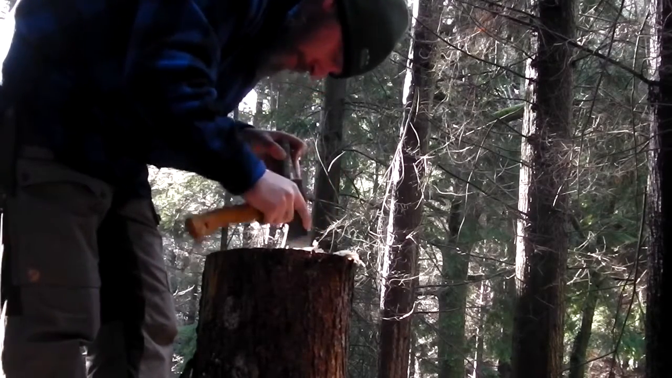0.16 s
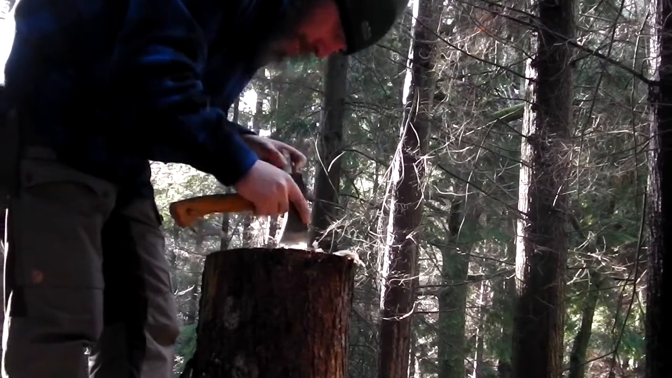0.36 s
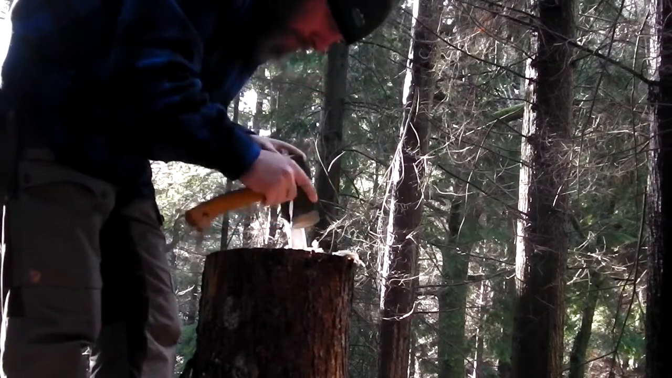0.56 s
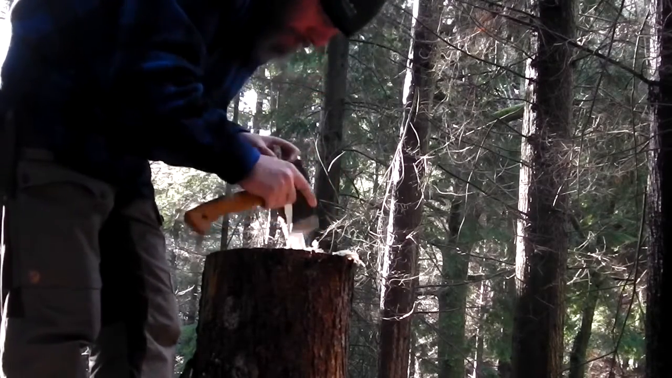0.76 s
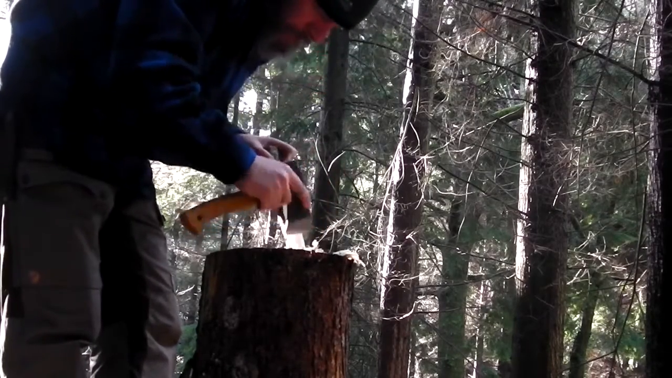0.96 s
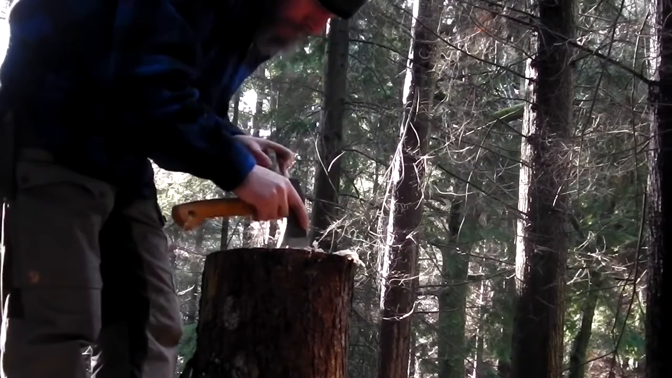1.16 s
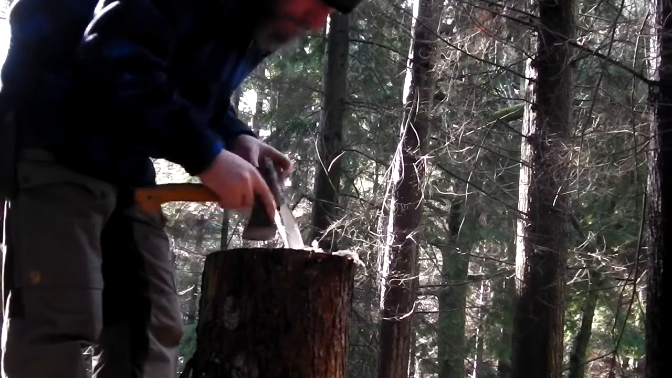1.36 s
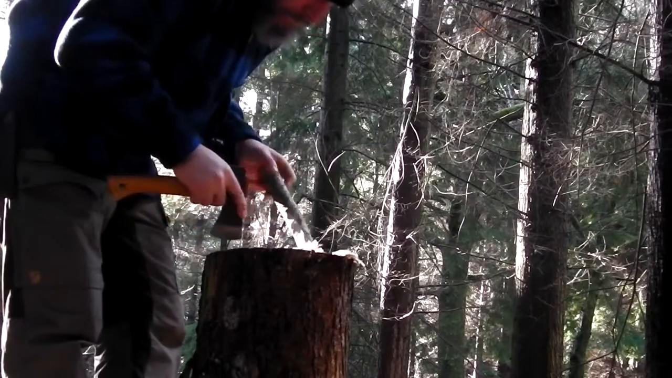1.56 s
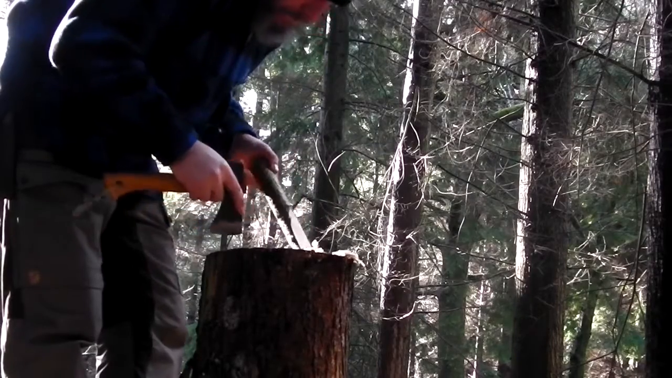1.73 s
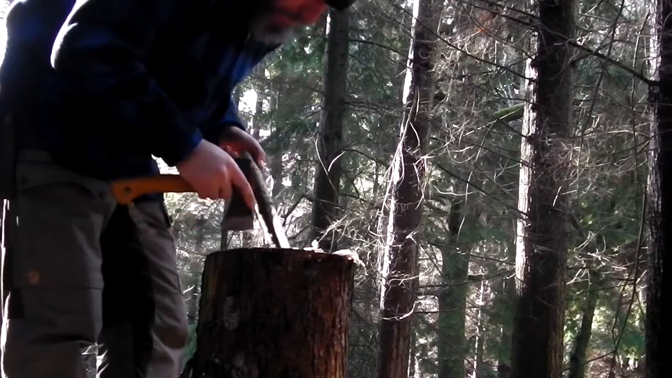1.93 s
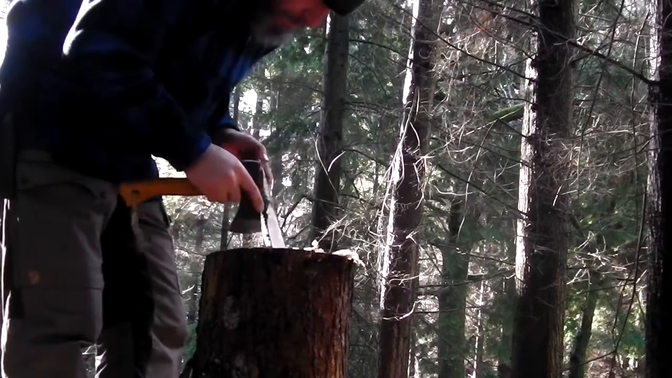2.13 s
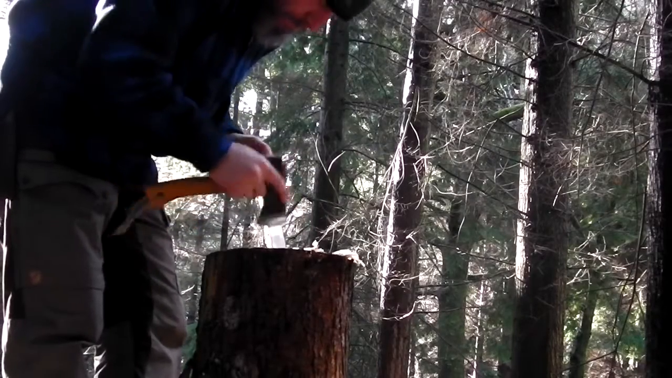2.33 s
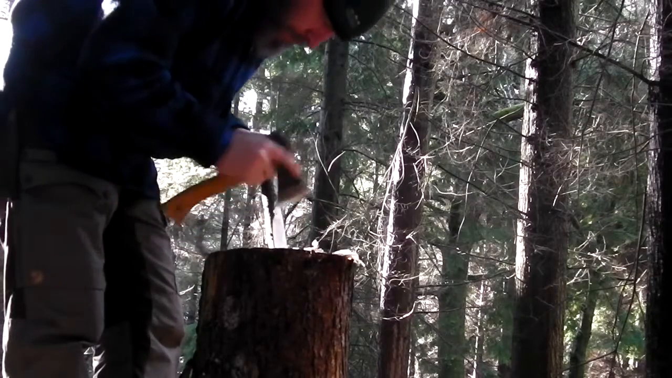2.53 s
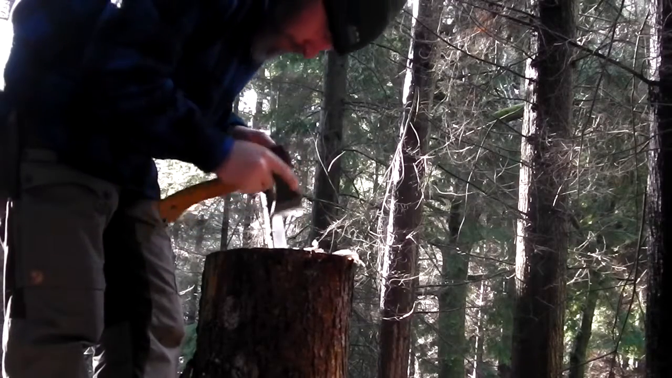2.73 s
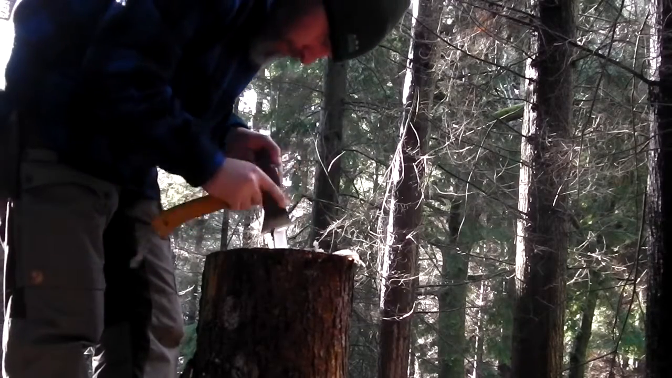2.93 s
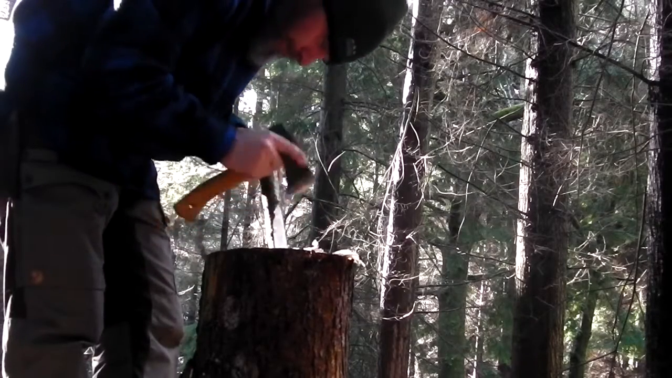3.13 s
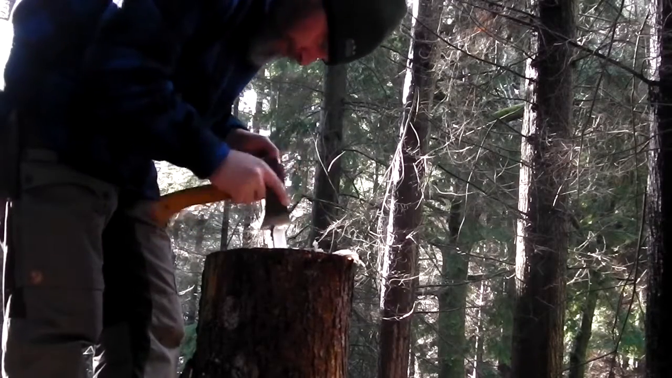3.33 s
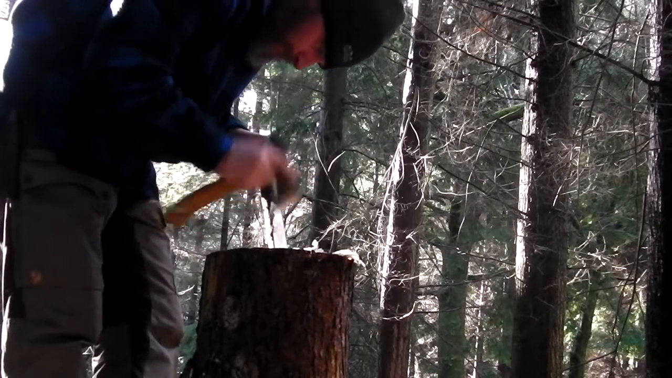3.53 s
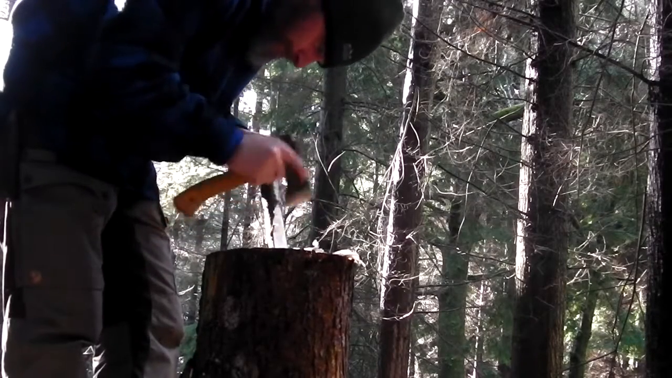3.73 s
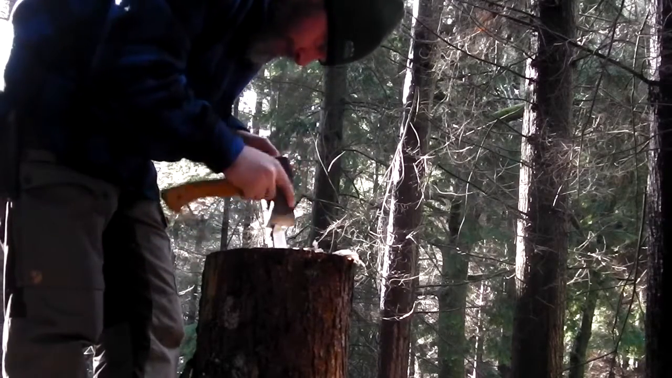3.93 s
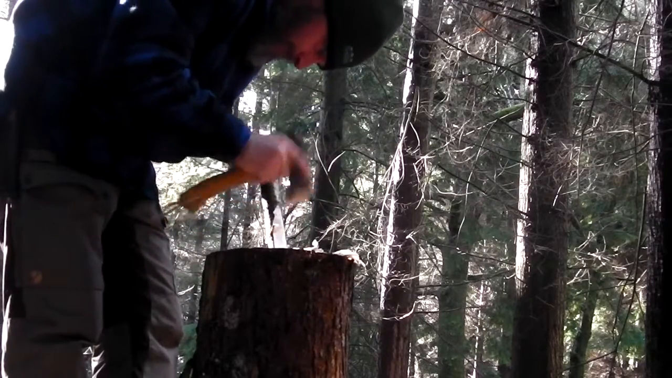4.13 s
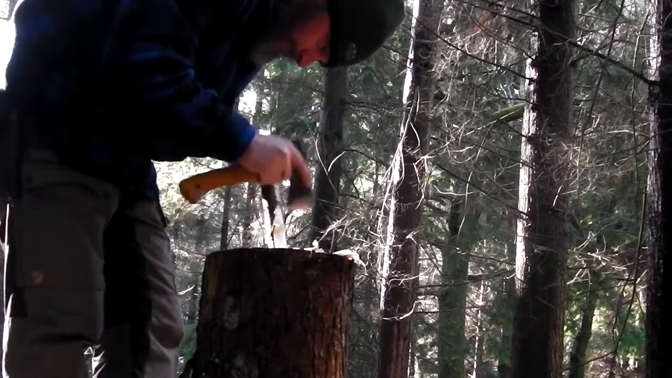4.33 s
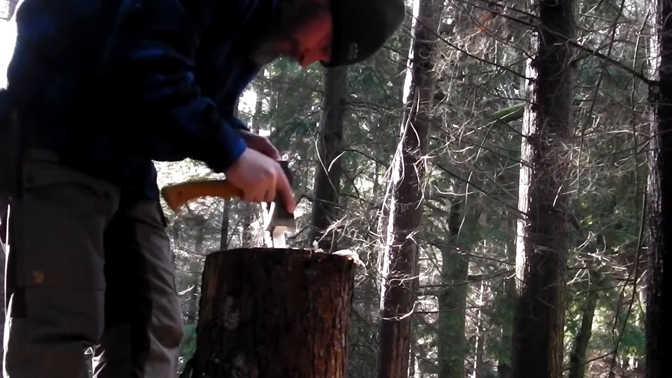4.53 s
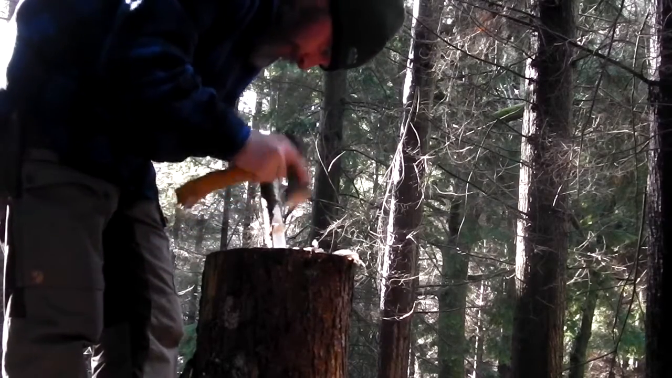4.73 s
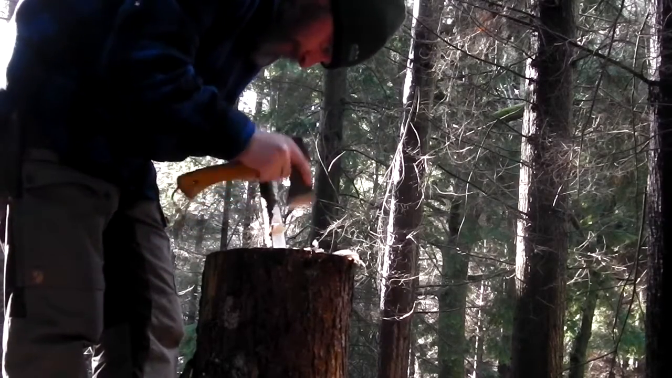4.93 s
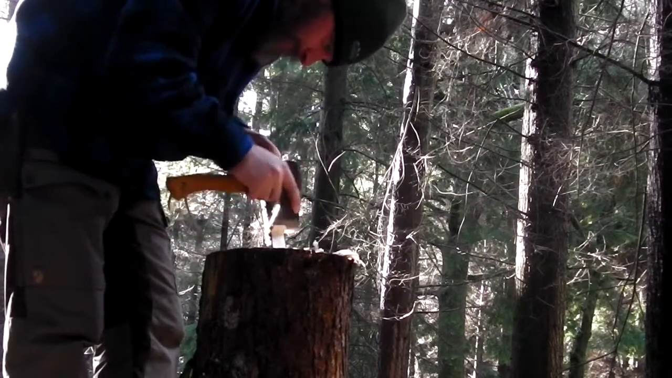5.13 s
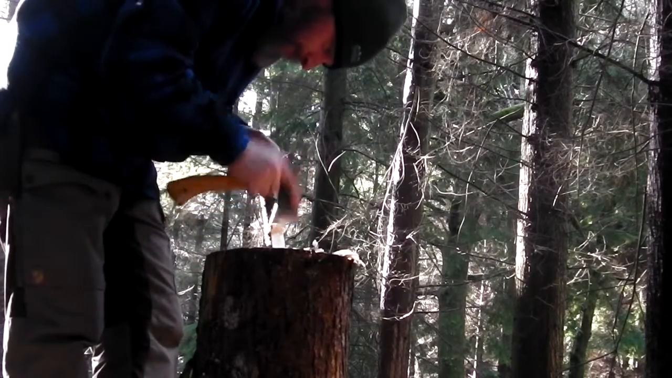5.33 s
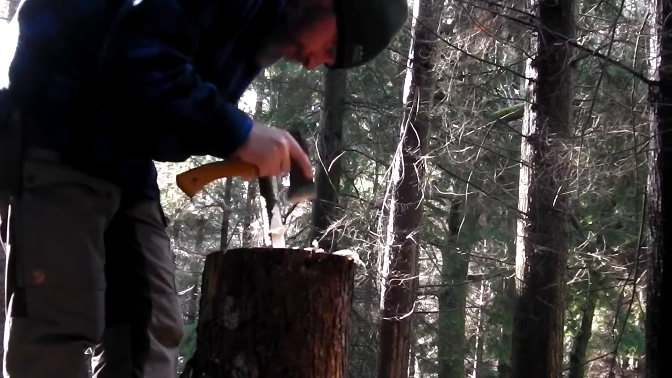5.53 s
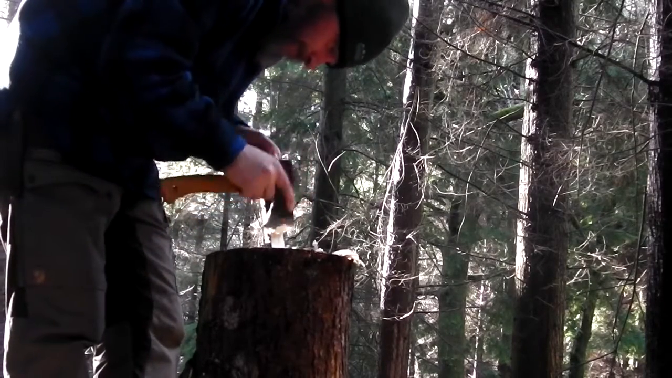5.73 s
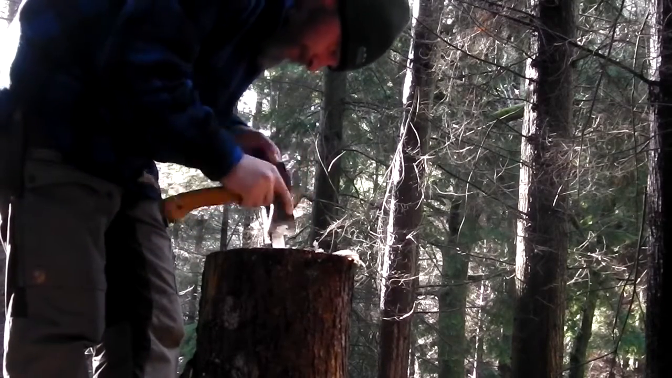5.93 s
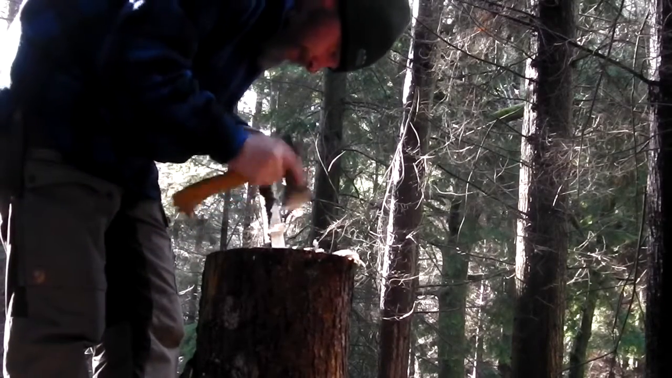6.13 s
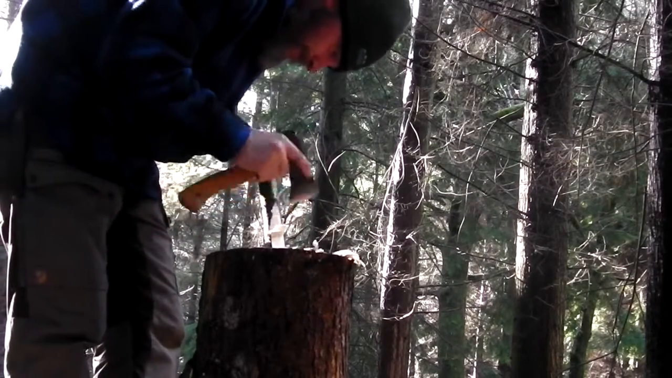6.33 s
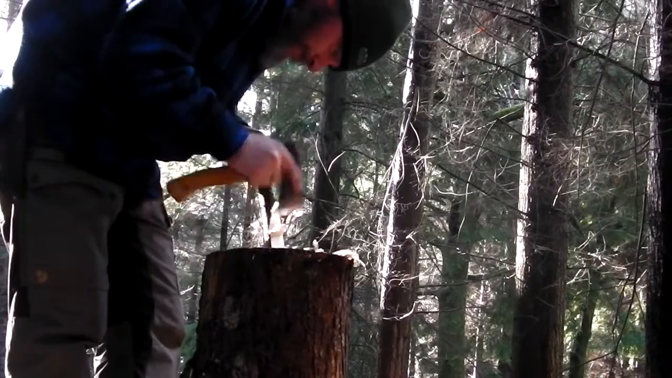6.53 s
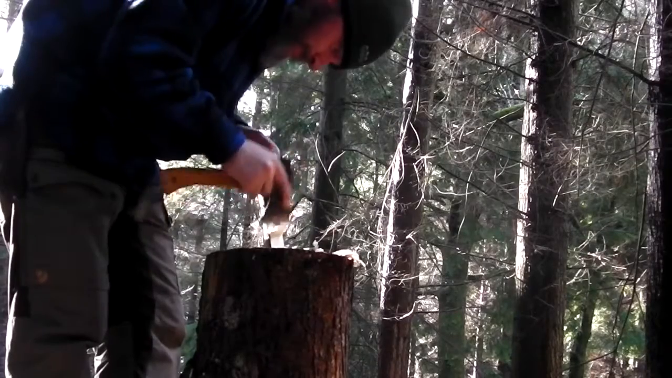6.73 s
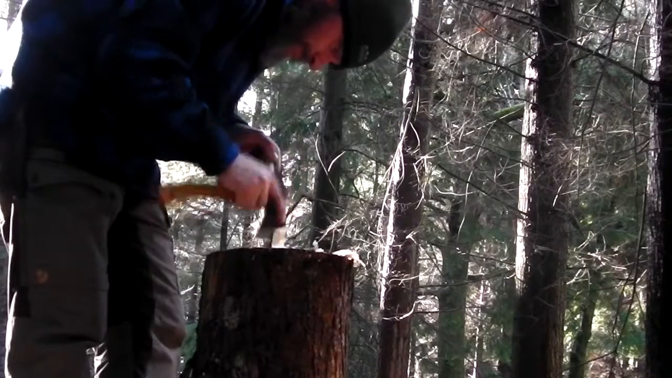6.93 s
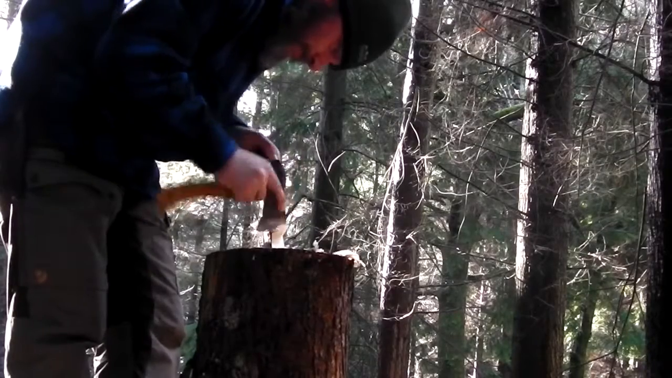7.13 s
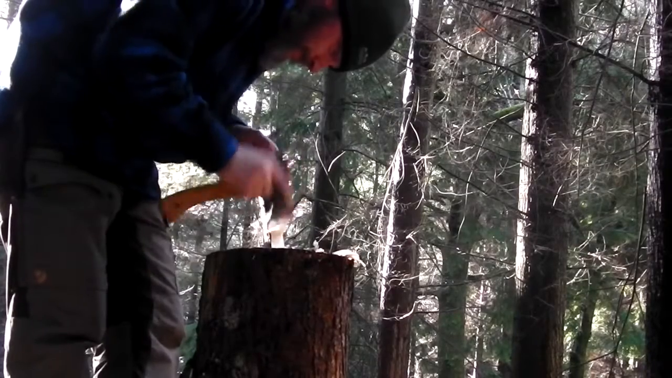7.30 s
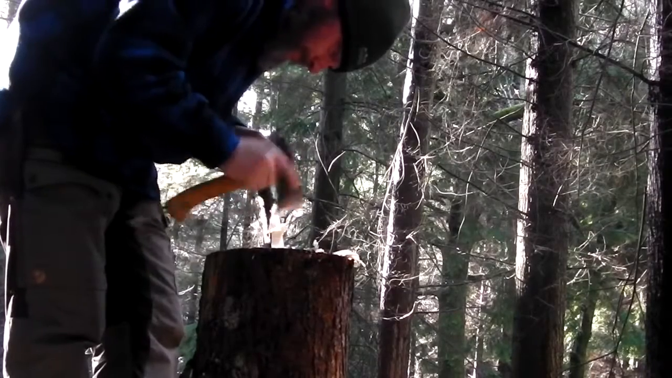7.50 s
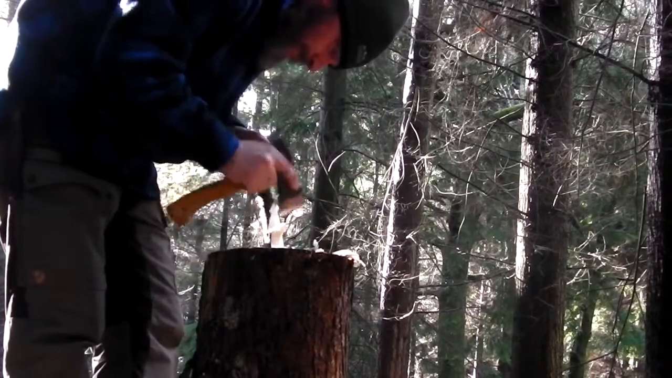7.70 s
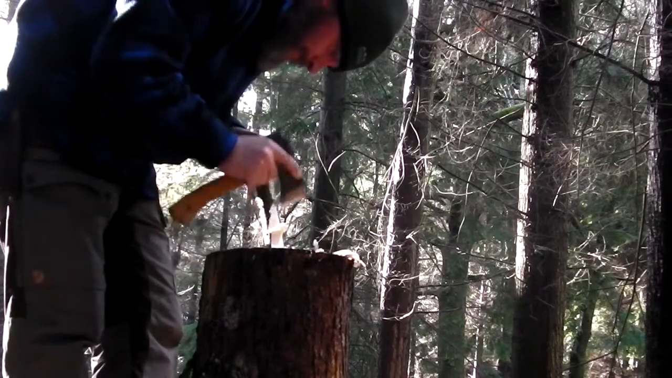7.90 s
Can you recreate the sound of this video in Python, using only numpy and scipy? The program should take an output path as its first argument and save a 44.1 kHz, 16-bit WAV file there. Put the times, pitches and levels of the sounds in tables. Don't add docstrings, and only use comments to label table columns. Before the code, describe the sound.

Stereo microphone about two metres from a stump outdoors. Light hatchet bites make hollow, dry clacks, many doubled by a tiny second knock, with a slight blade ring and torn-fibre crackle. A few loose taps, a gap of nearly two seconds, then regular chopping that speeds up and peaks near the end. Short diffuse woodland echo, low far traffic and engine drone, sparse thin bird whistles and gentle hiss.

```python
import sys
import numpy as np
from scipy import signal
from scipy.fft import rfft, irfft
from scipy.io import wavfile
from scipy.ndimage import uniform_filter1d

SR = 44100
rng = np.random.default_rng(int(sys.argv[2]) if len(sys.argv) > 2 else 0)


def level_to_linear(level):
    exponent = np.asarray(level, float) / 20
    return 10 ** exponent


def unload_audio(sound):
    columns = np.transpose(np.atleast_2d(sound))
    steps = np.round(np.clip(columns, -1, 1) * 32767)
    wavfile.write(sys.argv[1], SR, steps.astype(np.int16))


N = 355432

# start_s, bending_db, knock_db, knock_centre_hz, blade_db
BITES = [(0.135, -27, -28, 2470, -41), (0.652, -25.5, -24, 2350, -42.5), (0.858, -37, -29.5, 1570, -43.5),
         (1.044, -33.5, -32, 1760, -47.5), (2.939, -21, -30.5, 1710, -40), (3.269, -23, -27, 2230, -31.5),
         (3.592, -21, -24.5, 2250, -32.5), (3.894, -18, -20, 2340, -29), (4.201, -19.5, -25, 2460, -33),
         (4.5014, -18.5, -18.5, 2330, -33.5), (4.799, -20, -22.5, 2250, -38),
         (5.09, -22.5, -22.5, 2540, -37), (5.372, -21, -23, 2320, -41.5), (5.666, -21.5, -20.5, 2310, -33),
         (5.953, -23.5, -29.5, 2330, -38), (6.201, -22, -25.5, 2140, -36),
         (6.449, -19.5, -12.5, 2360, -25.5), (6.679, -20, -19.5, 2390, -31),
         (6.9134, -19.5, -14, 2440, -24), (7.129, -17.5, -9, 2590, -18), (7.3546, -19.5, -8.5, 2370, -26),
         (7.5694, -18.5, -12, 2450, -29), (7.778, -21, -21.5, 2160, -37.5),
         (7.989, -19.5, -15.5, 2083, -33.5)]
# start_s, bending_db, knock_db, stump_db
STOPS = [(0.864, -31, -41.5, -66), (1.05, -35, -43, -50), (1.083, -52, -64, -48), (2.943, -40, -26.5, -44),
         (3.275, -38.5, -34.5, -49), (3.599, -37, -30, -46), (4.208, -43, -32.5, -49),
         (4.509, -36, -31, -44), (4.515, -32, -34, -67), (4.813, -34, -34, -39), (4.819, -40, -45, -72),
         (5.108, -42, -49, -44.5), (5.387, -29.5, -32, -48), (5.394, -33.5, -37, -48),
         (5.679, -33, -26.5, -46.5), (5.961, -35, -38.5, -40.5), (6.21, -24, -27, -44),
         (6.456, -27.5, -28, -65), (6.69, -21.5, -24.5, -35), (6.696, -31, -46, -42),
         (6.924, -26.5, -23, -41.5), (7.133, -42, -21, -43), (7.36, -36, -33, -46),
         (7.574, -31, -21.5, -45), (7.995, -27, -34, -38)]
# start_s, bending_db, stump_db
NUDGES = [
    (2.6143, -22, -54),
    (0.398, -52, -67),
    (1.715, -53, -57),
    (1.869, -61, -51),
    (4.459, -65, -53),
    (4.719, -65, -53),
    (5.619, -58, -48.5),
    (6.168, -62, -62),
    (6.605, -60, -50),
]
# start_s, stump_db, stand_db
JOLTS = [(.135, -47, -47), (0.652, -46.5, -44), (0.857, -46, -70), (1.044, -44, -55), (2.615, -41, -47),
         (3.270, -52.5, -38), (3.59, -46, -40), (3.896, -42, -35), (4.202, -40.5, -36.5), (4.800, -68, -58),
         (5.371, -48, -70), (5.952, -56, -70), (6.201, -56, -70), (6.45, -38.5, -70), (6.679, -49, -68),
         (7.128, -44, -70), (7.569, -39.5, -75.5), (7.78, -43, -70), (7.989, -49, -71)]
# start_s, length_s, level_db, brightness_db_per_octave
TEARS = [(0.658, .018, -56, -2.5), (0.869, 0.016, -62.5, 3), (1.059, 0.022, -66, 0.5),
         (2.939, 0.0071, -47.5, 1), (3.268, 0.008, -49, 1.5), (3.596, 0.0066, -53, 2.5),
         (3.895, 0.0085, -50.5, -1), (4.203, 0.0077, -49.5, -2.5), (4.506, 0.0074, -60, 4),
         (4.8, 0.013, -51, -2.5), (5.091, 0.012, -52.5, -2), (5.381, 0.017, -55.5, 4),
         (5.68, 0.0084, -51, -0.5), (5.954, 0.0093, -52, -1.5), (6.202, 0.017, -51.5, -6),
         (6.447, 0.01, -49.5, -1), (6.684, .016, -44.5, -7), (6.928, 0.01, -50, 5), (7.136, 0.013, -50, -2),
         (7.353, 0.01, -46.5, -1), (7.569, 0.02, -56.5, -5), (7.781, 0.011, -55, 0),
         (7.995, 0.012, -49.5, -3.5)]
# pitch_hz, level_db, t60_s, left_minus_right_db, left_lead_rad
BENDING = [(935, 0, .04, 2.5, 0), (735, -8, .026, 2, .05), (550, -10.5, .026, 2, .1),
           (390, -14, .03, 1, .15), (1030, -15, .024, 2, 0)]
KNOCK = [(1714, 3.5, 0.027, -3.5, -0.16), (2062, 1, 0.021, 2.5, -0.055), (2393, 2, 0.024, 0.5, -0.24),
         (2696, 3.5, 0.01, 3, -0.53), (3015, 7.5, 0.014, 0.5, -.65)]
BLADE = [(3820, -5, 0.011, -14.5, -3.3), (4446, -8, 0.1, 0, 0.45), (4660, -5.5, 0.015, 2, -0.3),
         (4910, -14, 0.013, -8, 0.5), (6410, -13.5, 0.028, -0.5, 1.52), (8700, -18.5, 0.0088, 0, 2),
         (10350, -14, 0.019, 5.5, 1.57), (12200, -17, .006, 4, -8.5), (15200, -23, .005, 11, 1)]
STUMP = [(107.6, -2.5, 0.12, 0.1, 0.45), (151, 1, 0.039, 0.73, 0.45), (235, -4.5, 0.019, 0.85, .2)]
STAND = [(38, 0, 0.036, 0, .2)]
# pitch_hz, level_db
FIBRE_TONE = [(900, -7), (1400, -6), (2400, 2.5), (4500, -10.5), (6800, -12), (7800, -26.5), (10200, -17),
              (15000, -26)]
# pitch_hz, level_db
TRUNKS_TONE = [(150, -24), (500, -27), (950, -3), (1350, 1.5), (1900, 8), (2600, 1.5), (3400, -6),
               (4600, -5.5), (6500, -22), (15000, -38)]
NEAR_TRUNK_TONE = [(900, -9), (2000, -12), (3000, 3.5), (5000, 6), (9000, -6)]
# pitch_hz, level_db_per_hz
ROAR_MID = [(15, -43), (25, -34), (43, -12), (64, -1), (149, -1.5), (263, -13), (405, -8), (911, -10),
            (1840, -22), (4610, -26), (6600, -28.5), (7800, -31.5), (9500, -30), (16000, -32)]
ROAR_SIDE = [(15, -41), (25, -15), (80, 0), (153, -4), (206, -17), (405, -7.5), (695, -11), (775, -11),
             (2550, -16), (3820, -16), (16000, -27.5)]
# time_s, level_db
SWELL = [(0, -3.5), (.6, -5), (1.6, -3.8), (3.2, -2), (4.0, -.2), (4.9, -0.8), (5.3, 0), (6.8, 1.2),
         (8.06, -1.6)]
# time_s, pitch_hz, level_db
DRONE_LOW = [(0, 80, -76), (.6, 79, -69), (2.1, 80, -66), (2.7, 78, -71), (4.0, 77, -69), (4.6, 77, -78),
             (8.06, 77, -82)]
DRONE_HIGH = [(0, 150, -80), (1.3, 158, -73), (2.4, 158, -71), (3.0, 150, -80), (4.4, 128, -72),
              (5.2, 128, -66), (6.6, 140, -64), (7.4, 128, -68), (8.06, 127, -69)]
# start_s, length_s, first_pitch_hz, last_pitch_hz, level_db
BIRDS = [
    (.90, .14, 3300, 3280, -70),
    (1.15, .4, 4230, 4180, -74),
    (1.75, .22, 2850, 2850, -70),
    (4.85, .36, 3140, 3100, -58),
    (4.865, .06, 4150, 4120, -65),
    (7.865, .1, 3520, 3480, -65),
]


def colour(x, points):
    hz, db = np.transpose(points)
    grid = np.maximum(np.fft.rfftfreq(x.shape[-1], 1 / SR), 1)
    gain = level_to_linear(np.interp(np.log(grid), np.log(hz), db))
    return irfft(rfft(x) * gain, x.shape[-1])


def level(x, db):
    return x * level_to_linear(db) / np.sqrt(np.mean(x ** 2))


def walk(rate):
    hold = int(SR / rate)
    steps = np.repeat(rng.standard_normal(N // hold + 1), hold)
    return 1.5 * uniform_filter1d(uniform_filter1d(steps, hold), hold)[:N]


def add(out, x, s):
    i = int(s * SR)
    out[:, i:i + x.shape[1]] += x[:, :N - i]


def slope(modes, db_per_octave, pivot_hz):
    return db_per_octave * np.log2(np.array(modes)[:, :1] / pivot_hz)


def ring(modes, db, push_s, chance, tilt_db=0, choke_s=1, turn=0):
    t = np.arange(int(.12 * SR)) / SR - push_s
    hz, mode_db, t60, pan_db, lead = (c[:, None] for c in np.transpose(modes))
    detune, scatter, slip = chance[:, :len(hz), None]
    hz = hz * (1 + .015 * detune)
    mode_db = mode_db + tilt_db + 2.0001 * scatter
    dying = np.exp(-np.log(1000) * t / t60 - (t / choke_s) ** 2)
    building = np.sin(np.pi / 2 * (1 + t / push_s))
    size = level_to_linear(mode_db) * np.where(t < 0, building, dying)
    phase = 2 * np.pi * hz * t + 1.05 * slip - turn
    both = np.array([(size * level_to_linear(k * pan_db) * np.cos(phase + k * lead)).sum(0) for k in (.5, -.5)])
    return both * level_to_linear(db) / np.abs(both.mean(0)).max()


def blade_under(bend_db, knock_db):
    return bend_db - 7.5 + 0.86 * (knock_db - bend_db)


def hatchet():
    out = np.zeros((2, N))
    grip_s, wedge_s, blade_push_s = 0.009, .0017, 0.00081
    stop_hz, nudge_hz = 2290, 1930
    nudges = []
    for s, bend_db, _ in NUDGES:
        knock_db = bend_db - 19
        nudges.append((s, bend_db, knock_db, nudge_hz, blade_under(bend_db, knock_db)))
    stops = [(s, bend_db, knock_db, stop_hz, blade_under(bend_db, knock_db)) for s, bend_db, knock_db, _ in STOPS]
    edge_db = slope(BLADE, -1, BLADE[1][0])
    for contacts, stuck in ([*BITES, *nudges], 0), (stops, 1):
        choke_s = grip_s / (1 + stuck)
        low_db = stuck * slope(BENDING, -7, BENDING[0][0])
        for s, bend_db, knock_db, centre_hz, blade_db in contacts:
            s = s + stuck * .001
            chance = rng.standard_normal((4, 3, 9))
            near_db = np.maximum(-37 * np.abs(slope(KNOCK, 1, centre_hz)), -15.5)
            add(out, ring(BENDING, bend_db + 3.5, wedge_s, chance[0], low_db, choke_s), s)
            add(out, ring(KNOCK, knock_db + 5.5, wedge_s, chance[1], near_db, choke_s), s)
            add(out, ring(BLADE, blade_db + 5, blade_push_s, chance[2], edge_db, choke_s), s)
    return out


def shavings():
    out = np.zeros((2, N))
    t = np.arange(4096) / SR
    for s, length, db, bright_db in TEARS:
        chance = rng.random((3, 2, 4096))
        snap_size = level_to_linear(-2.5 * np.log(chance[2] + 1e-2))
        snaps = (chance[0] < .2) * np.sign(chance[1] - .5) * snap_size
        tone = [(hz, fibre_db + bright_db * np.log2(hz / 2400)) for hz, fibre_db in FIBRE_TONE]
        u = t / length
        swell = u ** 2 * np.exp(2 - 2 * u - u ** 2)
        mid, side = level(colour(snaps, tone), db + 18.5) * swell
        add(out, np.array([(mid + .4 * side) * level_to_linear(1.2), (mid - .4 * side) * level_to_linear(-1.2)]), s)
    return out


def stump():
    out = np.zeros((2, N))
    thuds = [row[:2] for row in JOLTS] + [(row[0], row[-1]) for row in NUDGES + STOPS]
    for s, thud_db in thuds:
        chance = rng.standard_normal((3, 3)) / 2
        add(out, ring(STUMP, thud_db + 7.5, 0.0038, chance, turn=np.pi / 2), s)
    return out


def stand():
    out = np.zeros((2, N))
    for s, _, db in JOLTS:
        add(out, ring(STAND, db, 0.002, rng.standard_normal((3, 1))), s)
    return out


def trunks(dry):
    echo_db, t60_s, rise_s = -6.5, 0.58, 0.049
    near_db, near_s = -35.5, .0503
    t = np.arange(int(.9 * SR)) / SR
    shape = (1 - np.exp(-(t / rise_s) ** 2)) * np.exp(-np.log(1000) * t / t60_s)

    def scatter():
        uneven = level_to_linear(1.4 * rng.standard_normal(len(t)))
        return colour(rng.standard_normal(len(t)) * uneven, TRUNKS_TONE) * shape

    mid, side = scatter(), scatter()
    echo = np.array([mid + 0.3 * side, mid - 0.4 * side]) * level_to_linear(echo_db) / np.sqrt(np.sum(mid ** 2))
    knocks = np.zeros((1, N))
    for s, _, knock_db, *_ in [*BITES, *STOPS]:
        knocks[0, int(s * SR)] = level_to_linear(knock_db)
    out = signal.fftconvolve(knocks, echo, axes=1)[:, :N]
    add(out, level_to_linear(near_db) * colour(dry, NEAR_TRUNK_TONE), near_s)
    return out


def roar():
    t = np.arange(N) / SR
    rumble_db = np.interp(t, *np.transpose(SWELL))
    roar_db = -.15 * rumble_db
    mid = level(colour(rng.standard_normal(N), ROAR_MID), -53.5)
    side = level(colour(rng.standard_normal(N), ROAR_SIDE), -55.5)
    spectrum = rfft([mid + side, mid - side])
    octave = np.log2(np.maximum(np.fft.rfftfreq(N, 1 / SR), 1) / 22)
    out = 0
    for k in np.arange(0, 10.5, .5):
        hz = 22 * 2 ** k
        swell_db = rumble_db if hz < 250 else roar_db * min(1, 1200 / hz)
        flicker_db = (.6 * walk(1.5) + 1.1 * walk(9)) * min(1, 1500 / hz)
        band = np.clip(1 - 2 * np.abs(octave - k), 0, 1)
        out = out + level_to_linear(swell_db + flicker_db) * irfft(spectrum * band, N)
    return out + np.array([[.06], [-.06]]) * out


def drone(curve):
    s, hz, db = np.transpose(curve)
    t = np.arange(N) / SR
    pitch = np.interp(t, s, hz) * (1 + .035 * walk(9))
    phase = 2 * np.pi * np.cumsum(pitch) / SR
    return 2 * level_to_linear(np.interp(t, s, db) + 2.2 * walk(7)) * np.sin(phase)


def birds():
    out = np.zeros((2, N))
    trill_hz = 15
    for s, length, first_hz, last_hz, db in BIRDS:
        u = np.linspace(0, 1, int(length * SR))
        throb = level_to_linear(walk(35)[:len(u)]) * (.7 - .3 * np.cos(2 * np.pi * trill_hz * length * u))
        pitch = first_hz + (last_hz - first_hz) * u + 15 * walk(30)[:len(u)]
        fade = np.minimum(40 * u, 1) * (1 - u) ** .6
        x = level_to_linear(db) * throb * fade * np.sin(2 * np.pi * np.cumsum(pitch) / SR)
        add(out, np.array([x, x]), s)
    return out


def scene():
    chop = hatchet() + stump() + stand() + shavings()
    return chop + trunks(chop) + roar() + drone(DRONE_LOW) + drone(DRONE_HIGH) + birds()


def band_limit(x):
    return signal.sosfilt(signal.butter(12, 16800, fs=SR, output="sos"), x)


def record(dry):
    ceiling, top_hz = 1.5, 15900
    soft = ceiling * np.tanh(dry / ceiling)
    dull = signal.sosfilt(signal.ellip(8, .3, 60, top_hz, fs=SR, output="sos"), soft)
    return band_limit(dull)


dry = scene()
out = record(dry)
unload_audio(out)
```